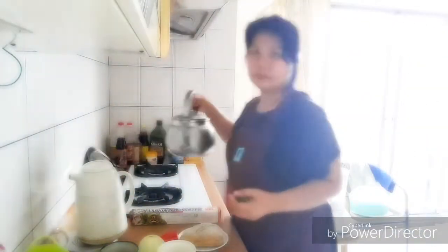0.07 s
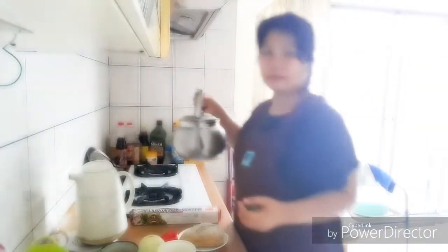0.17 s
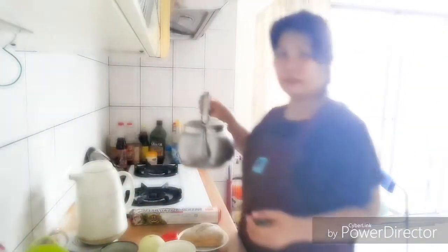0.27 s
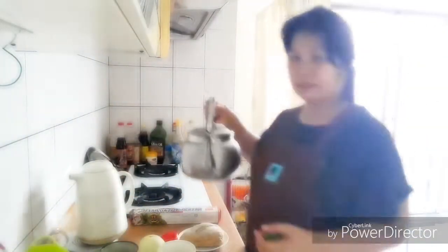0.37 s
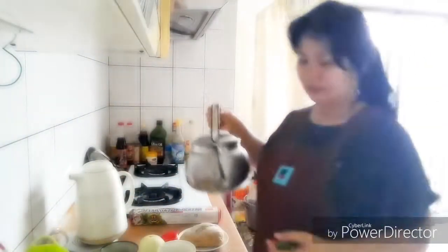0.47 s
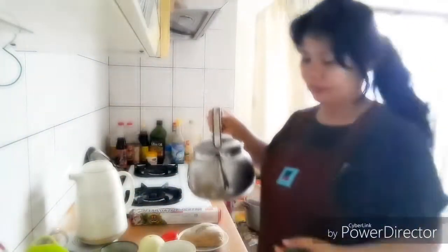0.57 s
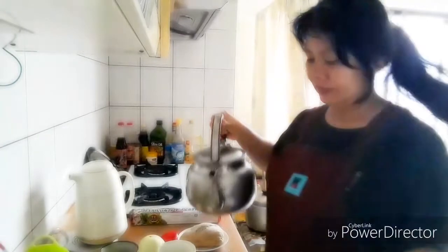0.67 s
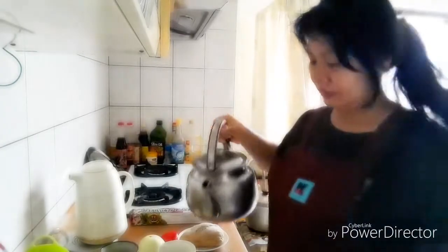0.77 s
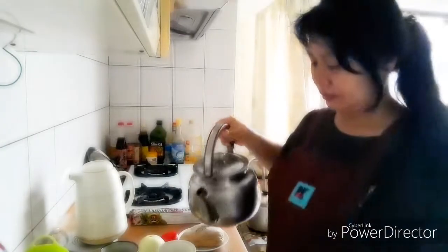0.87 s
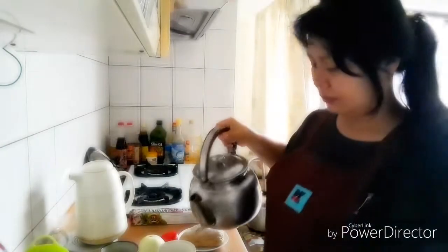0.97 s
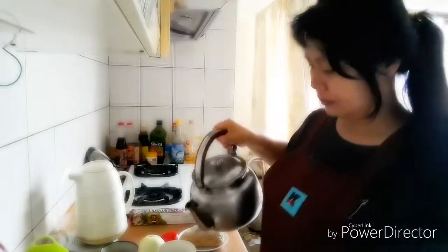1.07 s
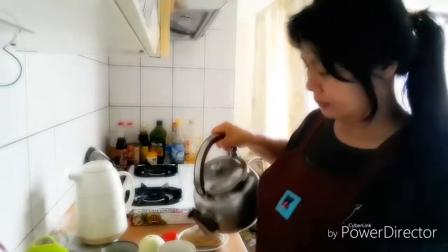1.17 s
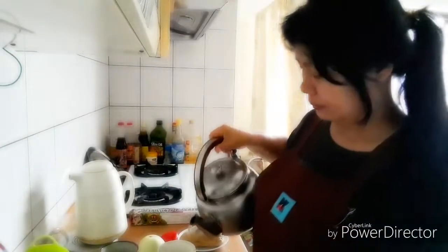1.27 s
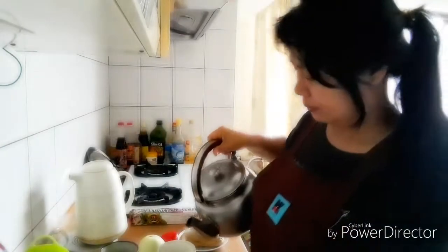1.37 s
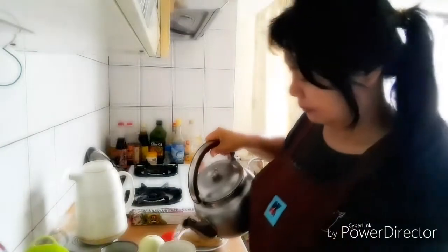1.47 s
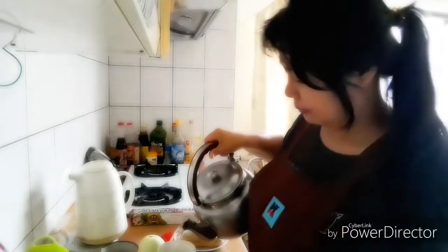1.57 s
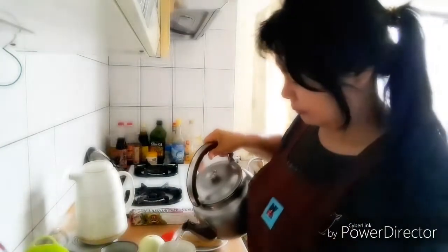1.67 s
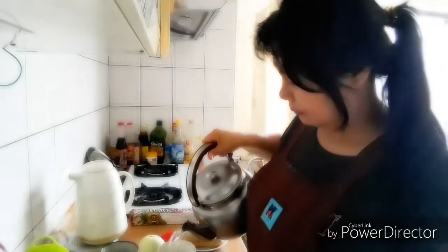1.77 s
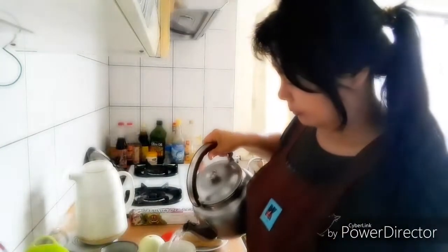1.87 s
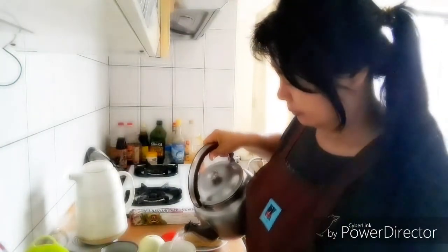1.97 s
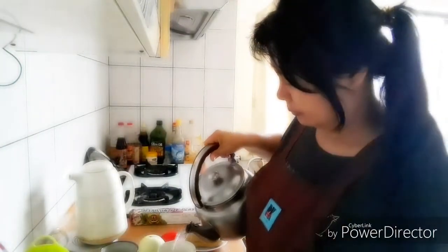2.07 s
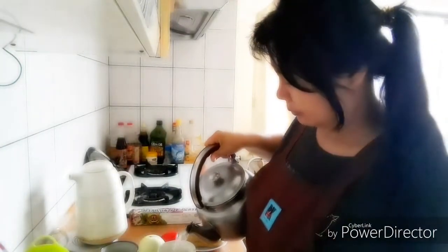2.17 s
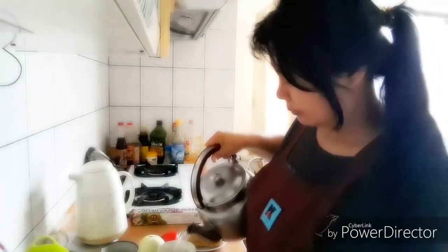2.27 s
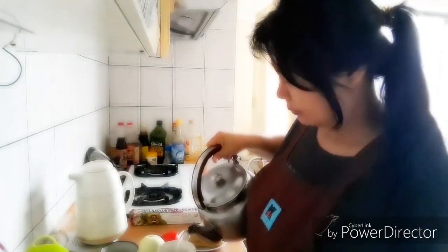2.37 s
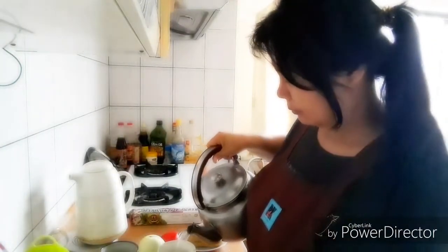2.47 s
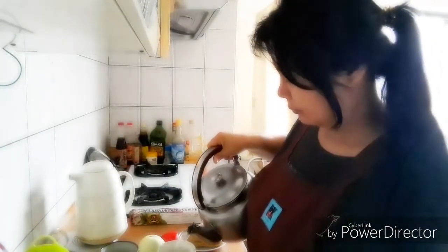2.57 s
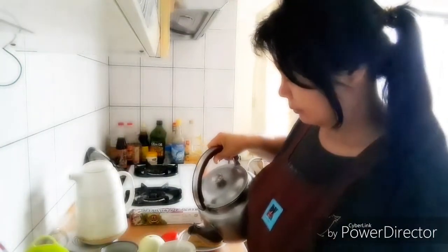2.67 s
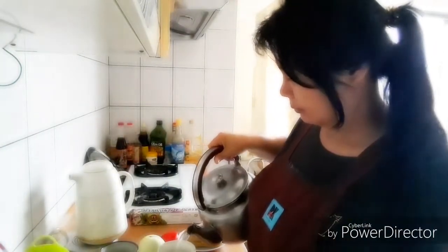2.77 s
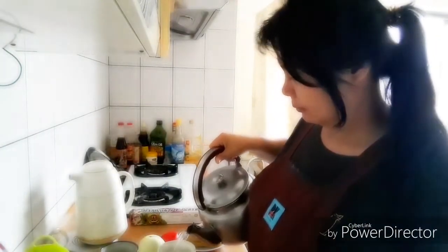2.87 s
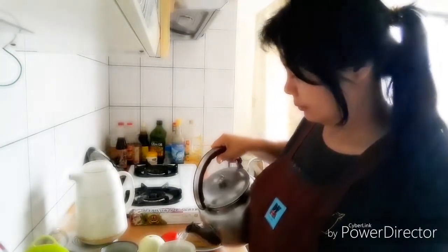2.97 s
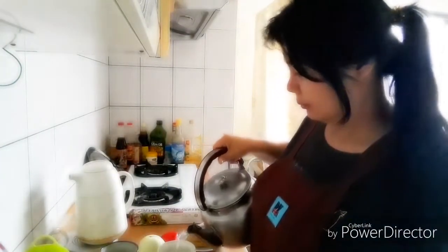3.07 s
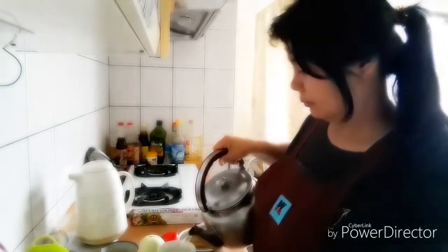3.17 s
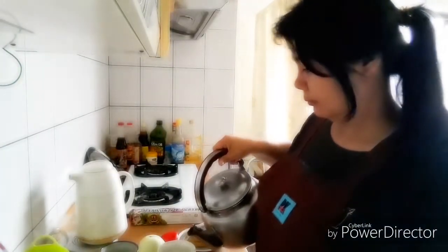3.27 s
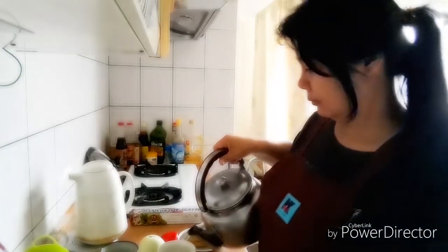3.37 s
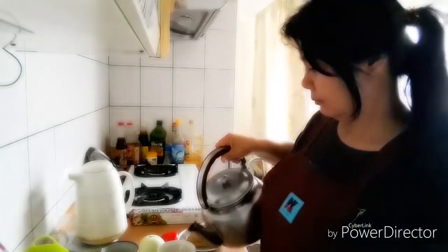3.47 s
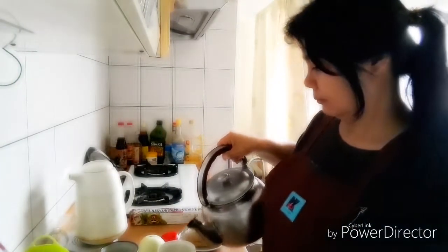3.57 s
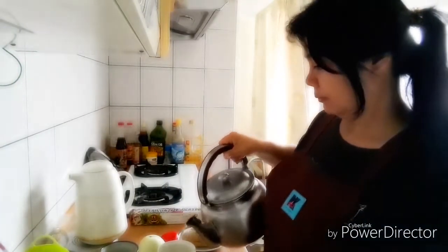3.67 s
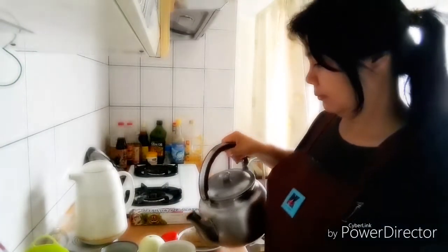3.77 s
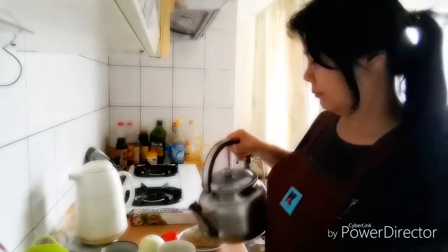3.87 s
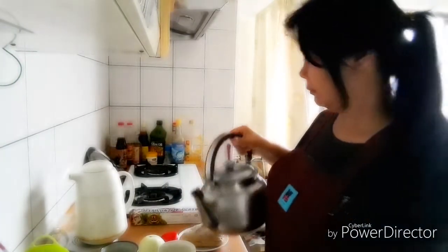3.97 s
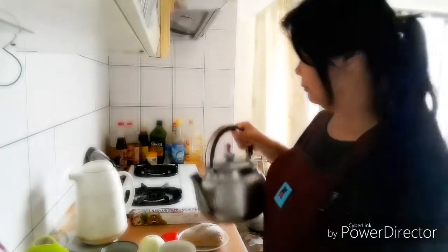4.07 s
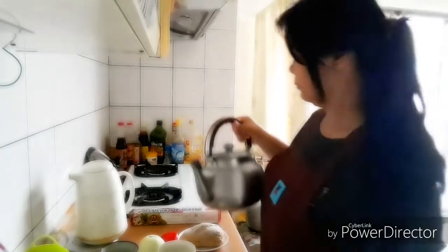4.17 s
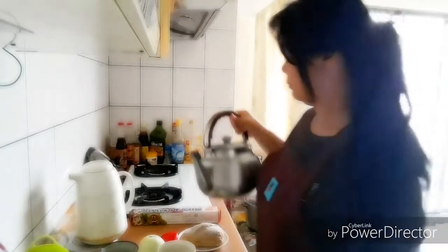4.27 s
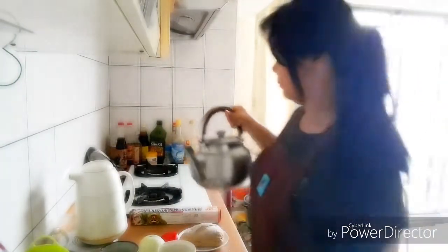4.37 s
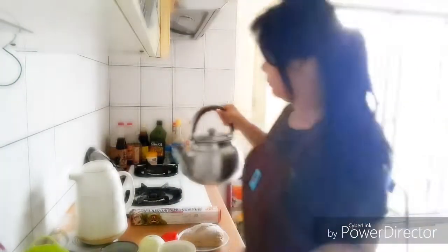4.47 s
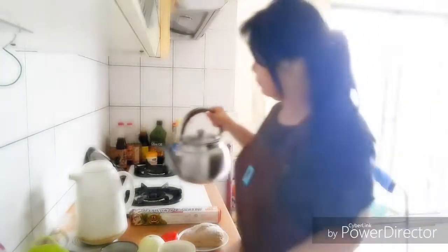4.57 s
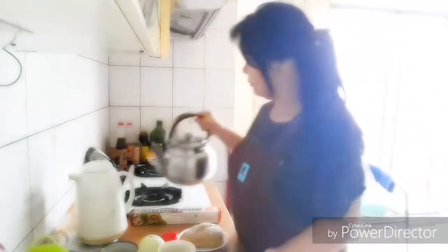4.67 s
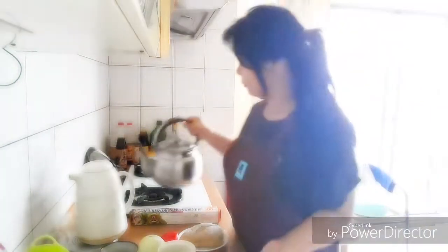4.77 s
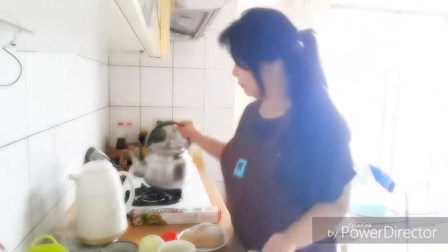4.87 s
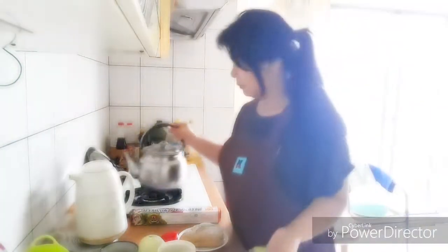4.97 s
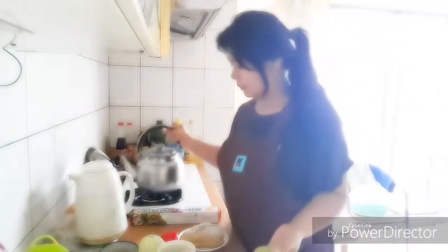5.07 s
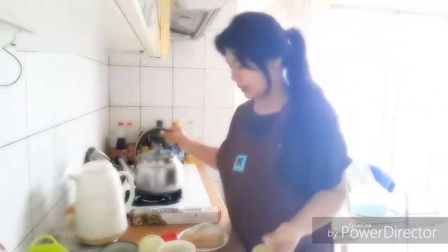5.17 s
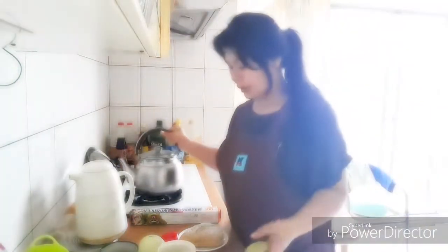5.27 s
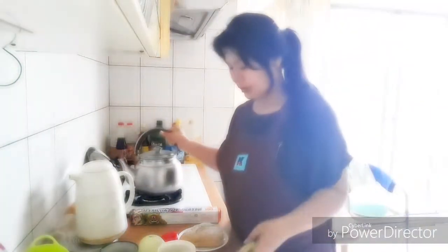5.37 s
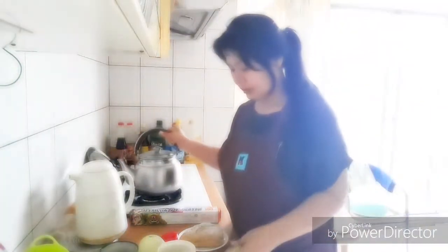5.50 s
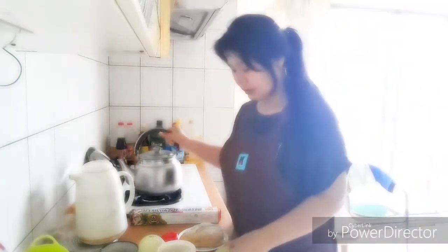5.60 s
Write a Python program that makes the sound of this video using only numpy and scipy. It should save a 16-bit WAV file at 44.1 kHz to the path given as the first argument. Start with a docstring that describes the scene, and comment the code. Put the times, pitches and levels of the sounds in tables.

```python
"""A small tiled kitchen: water trickles from a steel kettle into a cup, with splashes, bubbles and hollow gulps.
Droplets and bubbles are short dying tones mixed with noise; gulps are held tones of the air in the cup.
Slippers and cloth scuff as uneven noise, and a small mechanism ticks in regular runs of short noise bursts.
Then the kettle is set down hard on the stove grate and rocks: chattering blows ring steel and stove modes.
A low room rumble of filtered noise lies under everything, and a low hum swells at the very end."""
import sys
import numpy as np
from scipy import signal
from scipy.fft import rfft, irfft
from scipy.io import wavfile

SR = 44100
rng = np.random.default_rng(int(sys.argv[2]) if len(sys.argv) > 2 else 0)


def persist_wave(psi):
    """Save psi, clipped to +-1, as 16-bit WAV."""
    counts = np.round(np.clip(psi, -1, 1) * 32767).astype(np.int16)
    wavfile.write(sys.argv[1], SR, np.atleast_2d(counts).T)


N = 248415
T = np.arange(N) / SR   # s


def amp(db):
    """Turn dB into gain."""
    return 10 ** (np.asarray(db) / 20)


def rms_one(x):
    """Scale to rms 1."""
    return x / np.sqrt(np.mean(x ** 2) + 1e-20)


def white():
    """White noise for the whole scene."""
    return rng.standard_normal(N)


def in_time(rows):
    """Draw each level column as a curve over the scene, silent outside its rows."""
    s, *columns = np.transpose(rows)
    return [np.interp(T, s, c, left=-200, right=-200) for c in columns]


def at_hz(points, hz):
    """Read a table on a log-frequency axis."""
    table_hz, values = np.transpose(points)
    return np.interp(np.log(hz + 1), np.log(table_hz), values)


def coloured(x, spectrum):
    """Shape by a spectrum; rms 1."""
    gain = amp(at_hz(spectrum, np.fft.rfftfreq(N, 1 / SR)))
    return rms_one(irfft(rfft(x) * gain, N))


def band(x, low_hz, high_hz):
    """Band-pass, kept below the sampling limit."""
    edges_hz = [low_hz, min(high_hz, .45 * SR)]
    return signal.sosfilt(signal.butter(2, edges_hz, "band", fs=SR, output="sos"), x)


def lifted(x, peaks):
    """Raise a few resonances."""
    out = x
    for hz, width_hz, lift_db in peaks:
        out = out + (amp(lift_db) - 1) * band(x, hz - width_hz / 2, hz + width_hz / 2)
    return out


def drift(rate_hz):
    """Smooth random wandering with rms 1."""
    r = np.exp(-2 * np.pi * rate_hz / SR)
    wander = signal.lfilter([1], [1, -2 * r, r * r], rng.standard_normal(N + SR))
    return rms_one(wander[SR:])   # skip the first second, while the filter settles


def clicks(times, db):
    """Single-sample impulses at given times and levels."""
    out = np.zeros(N)
    np.add.at(out, (np.asarray(times) * SR).astype(int), amp(db))
    return out


def ring(x, hz, t60):
    """A resonator: a unit click sets a dying sine of height 1 ringing."""
    r, w = amp(-60 / (t60 * SR)), 2 * np.pi * hz / SR
    return signal.lfilter([0, np.sin(w)], [1, -2 * r * np.cos(w), r * r], x + 1e-18)


ONSET_S = 0.00087   # no contact is instant


def dying(x, t60):
    """Each click becomes an envelope that rises fast and dies."""
    lag = np.exp(-1 / (ONSET_S * SR))
    envelope = signal.lfilter([1], [1, -amp(-60 / (t60 * SR))], x + 1e-18)
    return signal.lfilter([1 - lag], [1, -lag], envelope)


def blip(length, hz, t60, rough, attack_s):
    """A short dying tone that rises in pitch, part of it noise in the same resonance."""
    t = np.arange(length) / SR
    tone = np.sin(2 * np.pi * hz * (t + 1.5 * t * t))
    noise = band(rng.standard_normal(length), hz * 0.919, hz * 1.059)
    noise = rms_one(band(noise, hz * 0.73, hz * 1.33))
    attack = np.sin(np.pi / 2 * np.minimum(t / attack_s, 1)) ** 2
    return ((1 - rough) * tone + rough * noise) * amp(-60 * t / t60) * attack


# Spectrum of the rumble. Each row: frequency in Hz, relative level in dB per Hz.
RUMBLE_SPECTRUM = [(15, -71), (25, -39.5), (91, -0.5), (179, -4), (241, -6), (261, -5.5), (413, -27.5),
                   (1150, -31.5), (3120, -43.5), (3470, -36.5), (3870, -38), (7390, -41.5), (9680, -63),
                   (11100, -33.5), (15700, -47)]
# Standing waves of the room. Each row: frequency in Hz, width in Hz, lift in dB.
STANDING_WAVES = [(110.3, 35.3, 5.5), (180.85, 8.6, 9), (427, 83.6, 15), (1400, 160, 4.5)]
ROOM_TONE_DB = -54   # before the slow drift


def room_tone():
    """Rumble lifted at the standing waves, faint hiss above, the level drifting a little."""
    noise = rms_one(lifted(coloured(white(), RUMBLE_SPECTRUM), STANDING_WAVES))
    return amp(ROOM_TONE_DB) * amp(1.2 * drift(4)) * noise


def kitchen(x, t60, dull_t60):
    """Tiles reflect as a dense noise tail, the treble dying with its own, second t60."""
    t = np.arange(SR // 2) / SR
    low, high = rng.standard_normal((2, len(t)))
    tail = band(low, 83, 2400) * amp(-60 * t / t60)
    tail = tail + band(high, 2000, 23000) * amp(-60 * t / dull_t60)
    tail = tail * (t > .004) / np.sqrt(np.sum(tail ** 2))   # the first reflection waits 4 ms
    return signal.fftconvolve(x, tail)[:N]


def patchy(x, edges_hz, patchy_db):
    """Rubbing is uneven: every band flickers on its own; rms 1."""
    out = np.zeros(N)
    for k, (low_hz, high_hz) in enumerate(zip(edges_hz[:-1], edges_hz[1:])):
        out += (-1) ** k * amp(patchy_db * drift(28.0)) * band(x, low_hz, high_hz)
    return rms_one(out)


# Spectrum of the rubbing hiss. Each row: frequency in Hz, relative level in dB per Hz.
HISS_SPECTRUM = [(1060, -12), (1600, -3), (2020, -3.5), (2340, -1.5), (3510, 1.5), (4010, 1), (5500, -1.5),
                 (6420, -5.5), (7500, -5), (9750, -39), (16500, -120)]
# Scuffs of slippers and cloth. Each row: loudest moment in seconds, rise in seconds, fall in seconds,
# hiss level in dB, dull level in dB, airy level in dB.
SCUFF_MOVES = [(0.01, 0.03, 0.1, -61.5, -67.5, -72), (0.215, 0.034, 0.27, -71, -61.5, -88),
               (0.56, 0.51, 0.12, -61, -68.5, -60), (0.596, 0.016, 0.25, -52.5, -58.5, -54.5),
               (0.945, 0.026, 0.26, -60, -66, -77), (3.95, 0.05, 0.19, -74, -83, -63),
               (4.52, 0.2, 0.46, -70, -67.5, -68), (4.711, 0.1, 0.28, -55.5, -63, -59),
               (4.87, 0.18, 0.11, -58.5, -65, -62), (5.225, 0.05, 0.04, -66, -66, -73)]
SCUFF_RANGE_DB = 20   # rise and fall span this much
# Cloth never quite rests. One row: hiss level in dB, dull level in dB, airy level in dB.
RESTING_RUSTLE_DB = (-84, -83, -72.5)


def scuffs():
    """Soles and cloth rub: three bands of noise whose powers add up move by move."""
    hiss = patchy(coloured(white(), HISS_SPECTRUM), [1500, 2600, 3600, 5000, 7500], 1.0)
    dull = patchy(white(), [520, 800, 1150, 1600], 1.5)
    airy = rms_one(lifted(band(white(), 3200, 17800), [(11720, 2800, 5.7)]))
    power = np.ones(N) * amp(RESTING_RUSTLE_DB)[:, None] ** 2
    for s, rise, fall, *levels_db in SCUFF_MOVES:
        shape_db = -SCUFF_RANGE_DB * np.maximum((s - T) / rise, (T - s) / fall)
        shape = amp(np.maximum(shape_db, -200))
        power = power + shape ** 2 * amp(levels_db)[:, None] ** 2
    return np.sum(np.sqrt(power) * [hiss, dull, airy], axis=0)


# Small taps and grazes of heel, handle and base. Each row: start in seconds, level in dB, starting pitch in Hz.
SMALL_TAPS = [(0.197, -56.5, 743), (0.591, -60, 4200), (0.935, -59, 1080), (1.068, -53, 745),
              (4.029, -59, 640), (4.673, -42.5, 5450), (4.688, -48, 5440), (4.718, -49, 4300),
              (4.899, -51, 631), (5.206, -53, 12200), (5.211, -58, 4800), (5.219, -62, 8100)]


def taps():
    """Each light contact is a short blip, more than half of it noise."""
    out = np.zeros(N)
    for s, level_db, hz in SMALL_TAPS:
        out[int(s * SR):][:6000] += amp(level_db) * blip(6000, hz, 0.18, 0.59, 0.00037)
    return out


# The handle hinge sings faintly. Each row: start in seconds, end in seconds, pitch in Hz, level in dB at the peak.
HINGE_SQUEAKS = [(4.004, 4.104, 3476, -74.5), (5.074, 5.257, 3090, -77)]


def squeaks():
    """The hinge is a narrow resonance driven by noise, swelling and fading."""
    out = np.zeros(N)
    for start, end, hz, level_db in HINGE_SQUEAKS:
        swell = np.sin(np.pi * np.clip((T - start) / (end - start), 0, 1))
        out += amp(level_db) * swell * rms_one(ring(white(), hz, 0.11))
    return out


# A small mechanism ticks in regular runs. Each row: first tick in seconds, end in seconds, base gap in seconds,
# slowing in seconds per tick squared, lowest Hz, highest Hz.
TICK_RUNS = [(0.007, 0.135, 0.0528, 0, 8500, 14500), (0.6754, 1.385, 0.0462, 0.00019, 9000, 13500),
             (3.3293, 3.48, 0.0425, 0, 6600, 9000), (4.094, 5.22, 0.0784, 0.00193, 6600, 7800)]
# Level of each run in dB.
TICK_RUN_DB = (-62, -60.5, -63, -64)
TICK_T60_S = 0.031


def ticks():
    """A small mechanism ticks in short noise bursts; gaps stay even or slowly grow."""
    out, k = np.zeros(N), np.arange(30)
    for (first, end, gap, slowing, low_hz, high_hz), level_db in zip(TICK_RUNS, TICK_RUN_DB):
        s = first + gap * k + slowing * k ** 2
        bursts = dying(clicks(s[s < end], level_db), TICK_T60_S)
        out += bursts * rms_one(band(white(), low_hz, high_hz))
    return out


HUM_START_S, HUM_SWELL_S, HUM_DB = 5.55, 0.07, -28.5   # rms level once swollen
HUM_HZ, HUM_RISE_HZ_PER_S = 162.3, 210


def hum():
    """A low sine swells at the end, its pitch gliding up."""
    since = np.maximum(T - HUM_START_S, 0)
    swell = np.minimum(since / HUM_SWELL_S, 1)
    turns = since * (HUM_HZ + HUM_RISE_HZ_PER_S * since / 2)
    return np.sqrt(2) * amp(HUM_DB) * swell * np.sin(2 * np.pi * turns)


def tilt(bright_db, hz):
    """A harder contact reaches higher modes: dB to add at this frequency."""
    return bright_db * np.log2(hz / 1000) / 2


# Modes of kettle and grate. Each row: frequency in Hz, relative level in dB, t60 in seconds before a 0.2 s cap.
STEEL_MODES = [(701, -3, 0.094), (873, -12, 0.2), (1016, -5, 0.11), (1153, 4.5, 0.075), (1220, -6, 0.39),
               (1390, -9, 0.092), (1570, -2.5, 0.25), (2070, -0.5, 0.083), (2223, -1.5, 0.3),
               (2360, -6, 0.14), (2723, -6, 0.15), (2825, -2, 0.07), (3110, -20, 0.13), (3620, -4.5, 0.083),
               (3670, -8, 0.14), (4380, -12, 0.43), (4800, -15, 0.15), (5090, -15, 0.13)]


def steel(s, blow_db, bright_db, knock_db):
    """Long chatter and a short knock, both noisy, ring the steel modes."""
    out = np.zeros(N)
    # thin sheet has many more weak modes, crowded and uneven
    crowd_hz = 800 * 2 ** rng.uniform(0, 2.8, size=60)
    crowd = [(hz, -12.0 - 3.5 * np.log2(hz / 1000), .1) for hz in crowd_hz]
    for hz, level_db, t60 in STEEL_MODES + crowd:
        mode_db = tilt(bright_db, hz) + level_db
        chatter = dying(clicks(s, blow_db + mode_db - 54.5), 0.34)
        knock = dying(clicks(s, knock_db + mode_db - 49.0), 0.013)
        out += ring((chatter + knock) * white(), hz, min(t60, .2))
    return out


# Modes of stove top and counter. Each row: frequency in Hz, relative level in dB, t60 in seconds.
STOVE_MODES = [(84.3, -14, 0.55), (108, -13, 0.33), (128, -4.5, 0.15), (154.5, -14.5, 1.6),
               (186, -8.5, 0.5), (228, -6, 0.2), (268, 3, 0.18), (434.5, -14.5, 0.28)]


def stove(s, blow_db, knock_db):
    """Chatter and a soft thud ring the heavy modes below the kettle."""
    out = np.zeros(N)
    for hz, level_db, t60 in STOVE_MODES:
        chatter = dying(clicks(s, blow_db + level_db - 50.0), 0.46) * white()
        # the heavy top yields softly
        thud = signal.lfilter(np.hanning(60) / 30, [1], clicks(s, knock_db + level_db - 23.5))
        out += ring(chatter + thud, hz, t60)
    return out


# Spectrum of loose grate and lid. Each row: frequency in Hz, relative level in dB per Hz.
RATTLE_SPECTRUM = [(180, -28), (300, -8), (326, -15.5), (425, -5.5), (622, -14), (1190, -2.5), (1820, -10),
                   (2190, -5.5), (2340, -6.5), (3600, -11.5), (4040, -11.5), (4930, -16), (7600, -21.5),
                   (9800, -29), (11700, -20), (15700, -34.5)]
# How long the rattle lasts. Each row: frequency in Hz, t60 in seconds.
RATTLE_DECAY = [(300, 0.9), (1500, 0.69), (5000, 0.65), (15000, 0.56)]


def rattle(s, blow_db, bright_db, knock_db):
    """Loose parts shake: flickering noise bands, each with its own decay."""
    out = np.zeros(N)
    noise = coloured(white(), RATTLE_SPECTRUM)
    for k, low_hz in enumerate(300 * 2. ** np.arange(0, 6.3, .7)):   # bands 0.7 octave wide
        tilt_db = tilt(bright_db, low_hz)
        shake = dying(clicks(s, blow_db + tilt_db - 32.0), at_hz(RATTLE_DECAY, low_hz))
        shake = shake + dying(clicks(s, knock_db + tilt_db - 24.0), 0.076)
        out += (-1) ** k * band(shake * amp(1.2 * drift(60)) * noise, low_hz, low_hz * 2 ** .7)
    return out


# Kettle on the grate. Each row: start in seconds, relative blow level in dB, brightness in dB,
# relative short knock level in dB.
KETTLE_BLOWS = [(5.239, -5, 2.5, -7.5), (5.247, -5.5, 5.5, 2), (5.252, -9, -7.5, -10),
                (5.291, -20, 0.5, -4), (5.326, -13, -3, -4.5), (5.379, -27, -3.5, -6.5),
                (5.471, -28.5, -8.5, -8.5), (5.502, -19, -9.5, -6.5), (5.511, -34, -13, -11.5)]


def clunk():
    """Every blow sets off a chatter that rings steel and stove and shakes loose parts; the hum joins."""
    s, blow_db, bright_db, knock_db = np.transpose(KETTLE_BLOWS)
    out = steel(s, blow_db, bright_db, knock_db) + stove(s, blow_db, knock_db)
    return out + rattle(s, blow_db, bright_db, knock_db) + hum()


def grains(per_s, low_hz, high_hz, cycles):
    """Random droplets, each swelling and dying within cycles at one of ten pitches; rms 1."""
    sizes_db = 3.9 * np.minimum(rng.exponential(1, N), 4)
    born = (rng.random(N) < per_s / SR) * amp(sizes_db)
    dealt = rng.integers(0, 10, N)
    out = np.zeros(N)
    for k, hz in enumerate(np.geomspace(low_hz, high_hz, 10)):
        swelling = ring(born * (dealt == k), hz, cycles / hz)
        out += rms_one(ring(swelling, hz, 2.3 / hz))
    return rms_one(out)


# The stream over time. Each row: time in seconds, fine spray in dB, bubbling in dB (both before kind and flicker).
STREAM_LEVELS = [(1.4, -84, -103), (1.49, -66, -71), (1.54, -63, -73), (1.63, -64, -64), (1.74, -56, -65),
                 (1.9, -65, -72.5), (2.1, -60.5, -73.5), (2.28, -66, -62.5), (2.55, -69.5, -66),
                 (2.8, -66, -73), (3.14, -67, -73.5), (3.25, -62.5, -78), (3.5, -65.5, -79.5),
                 (3.78, -64, -76), (3.9, -102, -69.5), (4.0, -86, -100)]
# Kinds of droplet. Each row: lowest Hz, highest Hz, grains per second, t60 in cycles,
# plain noise against grains, share of bubbling 0-1, level in dB relative to the stream.
DROPLET_KINDS = [(6500, 17300, 970, 23, 0.7, 0.13, -4), (2940, 6200, 1000, 57, 0.58, 0.48, 1),
                 (1057, 2580, 760, 59, 0.15, 1, 0), (460, 1280, 250, 6.7, 0.58, 0.56, -5),
                 (895, 5250, 90, 60, 0.05, 0.61, -3.5)]


def stream():
    """Droplet kinds follow spray, bubbling or a blend of both, each flickering on its own."""
    out = np.zeros(N)
    spray_db, bubbling_db = in_time(STREAM_LEVELS)
    for low_hz, high_hz, per_s, cycles, noise, share, kind_db in DROPLET_KINDS:
        level_db = kind_db + spray_db + share * (bubbling_db - spray_db)
        wet = grains(per_s, low_hz, high_hz, cycles) + noise * rms_one(band(white(), low_hz, high_hz))
        out += amp(level_db) * amp(2.5 * drift(16)) * wet
    return out


# Single splashes. Each row: start in seconds, relative level of the high spray in dB,
# relative level of the middle slap in dB.
SINGLE_SPLASHES = [(1.4305, -43.5, -63.5), (1.4828, -43, -46), (1.4978, -40.5, -52), (1.543, -49, -55),
                   (1.57, -46, -56), (1.611, -58, -46), (1.6996, -52, -64), (1.7361, -52.5, -65),
                   (1.8585, -55.5, -51.5), (1.9286, -52.5, -72), (2.0124, -50.5, -78), (2.062, -62, -52.5),
                   (2.1288, -51, -46), (2.288, -56.5, -41.5), (2.3386, -50, -59), (2.3785, -51, -48),
                   (2.4575, -40.5, -49), (2.516, -58.5, -56), (2.641, -52, -50.5), (2.7702, -50.5, -75),
                   (3.026, -49.5, -57), (3.0885, -58, -59), (3.15, -55.5, -63), (3.261, -54, -66),
                   (3.292, -49, -55), (3.526, -60, -69), (3.5455, -57.5, -75), (3.7709, -54, -80),
                   (3.8491, -41.5, -47.5), (3.877, -39, -58), (3.8868, -35.5, -41)]


def splashes():
    """Each splash is a burst of high spray noise over a longer middle slap."""
    s, spray_db, slap_db = np.transpose(SINGLE_SPLASHES)
    top = clicks(s, spray_db)
    spray = (dying(top, 0.03) + 0.14 * dying(top, 0.036)) * rms_one(band(white(), 9100, 15600))
    return spray + dying(clicks(s, slap_db), 0.074) * rms_one(band(white(), 2870, 7700))


# The clearest bubbles. Each row: start in seconds, level in dB before the cup wall, starting pitch in Hz.
CLEAR_BUBBLES = [(1.484, -29, 1026), (1.49, -34, 454), (1.573, -46, 2980), (1.609, -41, 5400),
                 (1.613, -42.5, 7260), (1.618, -45, 1540), (1.683, -47, 4200), (1.692, -33.5, 482),
                 (1.697, -43.5, 6200), (1.698, -42.5, 1090), (1.732, -43.5, 4630), (1.755, -50, 3450),
                 (1.784, -49, 1420), (1.858, -44.5, 1400), (1.877, -44, 4700), (1.883, -39, 943),
                 (1.899, -44.5, 3430), (2.063, -37, 1346), (2.112, -34, 410), (2.127, -37.5, 3610),
                 (2.133, -31.5, 1050), (2.136, -32, 388), (2.161, -34.5, 1910), (2.209, -43, 1450),
                 (2.288, -36, 1375), (2.297, -34.5, 975), (2.341, -38, 1220), (2.38, -41, 1250),
                 (2.401, -43, 2150), (2.445, -39.5, 1440), (2.458, -40.5, 8040), (2.457, -44, 3700),
                 (2.487, -43, 3580), (2.487, -46, 1200), (2.5, -40.5, 2100), (2.558, -54, 2500),
                 (2.622, -43.5, 4460), (2.624, -47, 1400), (2.641, -39, 1525), (2.642, -45, 7960),
                 (2.682, -44, 1830), (2.818, -45, 1220), (2.891, -53.5, 4830), (3.026, -51.5, 7640),
                 (3.04, -49, 2390), (3.059, -49.5, 4030), (3.091, -42.5, 2020), (3.108, -49, 855),
                 (3.12, -48, 2500), (3.159, -49.5, 2430), (3.278, -50.5, 2630), (3.299, -48, 4800),
                 (3.341, -52.5, 2130), (3.527, -53, 8160), (3.655, -55, 2790), (3.715, -50.5, 2700),
                 (3.788, -44.5, 6450), (3.852, -43.5, 2690), (3.896, -47.5, 3700)]
BUBBLE_T60_S, BUBBLE_CYCLES = 0.048, 10.7   # a bubble dies in this time plus this many cycles
BROOD_DB = -10.5   # the bubbles that follow, at their loudest, against the first


def bubbles():
    """Trapped air rings and rises in pitch; five weaker bubbles of nearby pitch follow; high ones are noisier."""
    out, chance = np.zeros(N), rng.random((len(CLEAR_BUBBLES), 5, 3))
    for (s, level_db, hz), brood in zip(CLEAR_BUBBLES, chance):
        rough = np.clip(.62 + .12 * np.log2(hz / 1000), .4, .9)
        t60 = BUBBLE_T60_S + BUBBLE_CYCLES / hz
        out[int(s * SR):][:8000] += amp(level_db) * blip(8000, hz, t60, rough, 0.38 / hz + 0.00017)
        for late, pitch, size in brood:
            start = int((s + .006 + .05 * late) * SR)
            brood_hz = hz * 2 ** (1.1 * (pitch - .4))
            brood_db = level_db + BROOD_DB - 3.9 * size
            follower = blip(4000, brood_hz, 0.031, rough, 2.0 / brood_hz + 0.00067)
            out[start:][:4000] += amp(brood_db) * follower
    return out


# Air in the cup. Each row: start in seconds, level in dB before flicker and cup wall, pitch in Hz, held in seconds.
CUP_GULPS = [(1.484, -44, 271, 0.0076), (2.135, -43, 275, 0.018), (2.29, -39.5, 269, 0.011),
             (2.34, -39.5, 267, 0.022), (2.383, -35.5, 274, 0.017), (2.457, -37.5, 259.4, 0.027),
             (2.515, -45.5, 275, 0.042), (2.685, -44, 253, 0.027), (2.83, -49, 250.5, 0.028),
             (3.033, -53, 268, 0.012), (3.105, -44.5, 274, 0.0061)]
GULP_RISE_S, GULP_T60_S, SLAP_DB = 0.002, 0.091, -6   # the slap is set against its gulp


def gulps():
    """The air column swells, holds and dies; water slaps as the air escapes."""
    s, level_db, _, _ = np.transpose(CUP_GULPS)
    out = dying(clicks(s, level_db + SLAP_DB), 0.071) * rms_one(band(white(), 180, 2100))
    uneven = amp(1.5 * drift(30))
    for start, level_db, hz, held in CUP_GULPS:
        t = np.maximum(T - start, 0)
        fade = amp(-60 * np.clip(t - held, 0, 1) / GULP_T60_S)
        shape = np.minimum(t / GULP_RISE_S, 1) * fade
        out += amp(level_db) * shape * uneven * np.sin(2 * np.pi * hz * t)
    return out


# Resonances of the cup wall. Each row: frequency in Hz, width in Hz, lift in dB.
CUP_RESONANCES = [(1403, 180, 3), (2150, 120, 5), (2770, 120, 3.5), (3580, 360, 2.5), (4830, 300, 2.5),
                  (11580, 2240, 6)]


def water():
    """The stream spatters; splashes, bubbles and gulps stand out; the cup wall colours it all."""
    return lifted(stream() + splashes() + bubbles() + gulps(), CUP_RESONANCES)


def scene():
    """All sources; water and clunk fill the room."""
    pour, blow = water(), clunk()
    near = pour + blow + scuffs() + taps() + squeaks() + ticks()
    bass_cut = signal.butter(5, 70, "high", fs=SR, output="sos")   # the microphone picks up little deep bass
    near = signal.sosfilt(bass_cut, near)
    echo = amp(-8.0) * kitchen(pour + 0.4 * blow, 0.31, 0.14)
    return (near + echo + room_tone())[None]


CUTOFF_HZ = 16100


def record(dry):
    """A steep low-pass cuts the top."""
    return signal.sosfilt(signal.cheby2(16, 60, CUTOFF_HZ, fs=SR, output="sos"), dry)


dry = scene()
out = record(dry)
persist_wave(out)
```